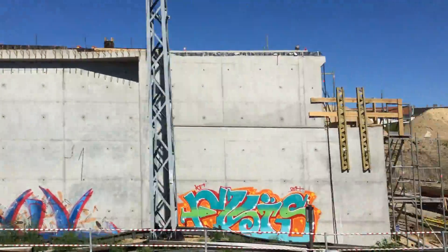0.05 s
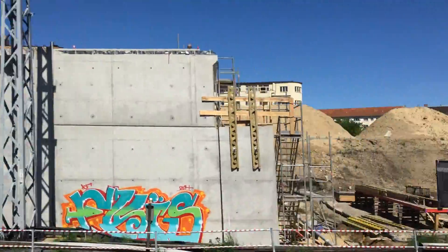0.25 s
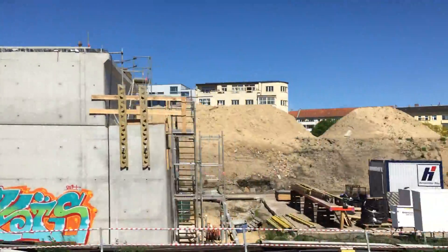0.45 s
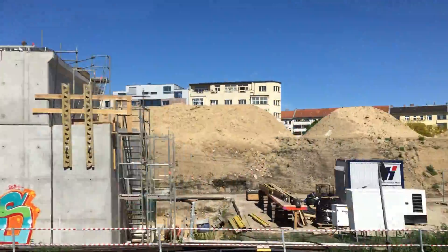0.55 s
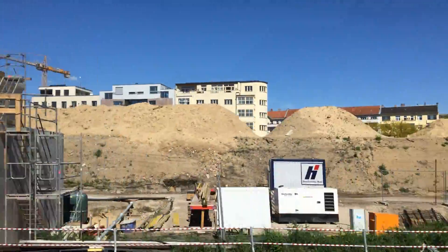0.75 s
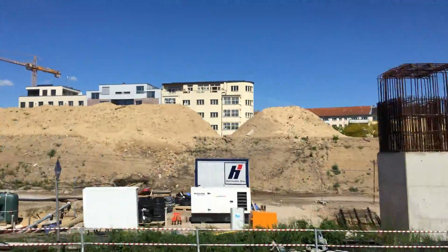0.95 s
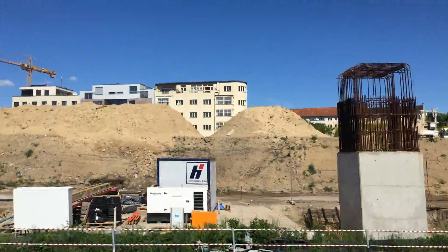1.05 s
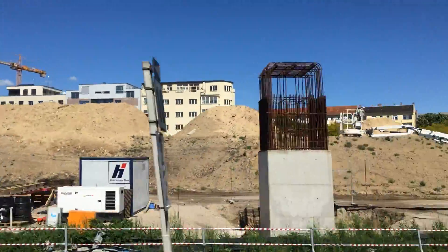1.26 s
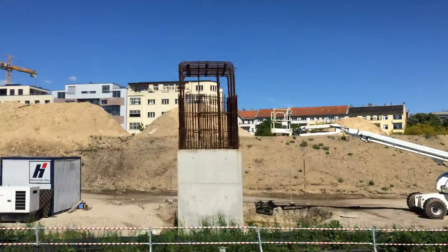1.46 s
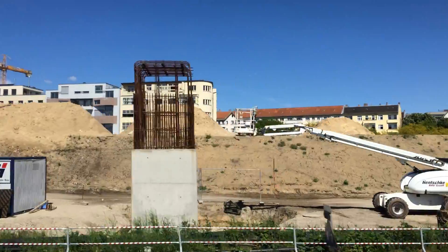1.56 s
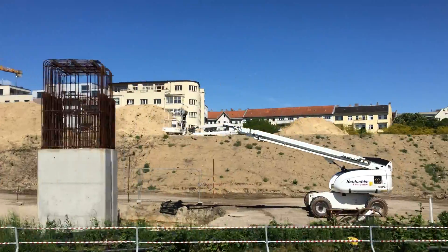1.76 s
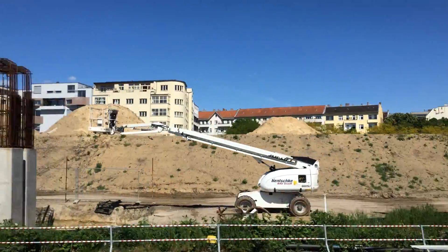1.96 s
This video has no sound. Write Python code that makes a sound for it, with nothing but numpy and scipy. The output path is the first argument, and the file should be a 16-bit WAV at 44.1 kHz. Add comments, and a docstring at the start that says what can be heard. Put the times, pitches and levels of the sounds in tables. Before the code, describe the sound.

A train's low rumble and wavering hum run for two seconds, heard inside the carriage over soft hiss and faint electric ticking. From about 0.85 seconds the wheels knock over a rail joint with a brief squeak, hardest at 1 second, where steel rings briefly and the hiss swells. A loose plastic panel rattles in dry clicks from 0.9 to 1.2 seconds, with scattered small clicks before and after.

```python
"""A low rumble and a wavering hum: inside a rolling train carriage, close to the window.
Wheel and rail roughness keeps the car body sounding. About a second in, the wheels knock over a rail
joint, with a brief squeak and a ring of steel. A loose plastic panel creaks and rattles in dry clicks,
hardest around the jolt. Underneath are a faint electric tick and a soft hiss that swells at the jolt."""
import sys
import numpy as np
from scipy import signal
from scipy.fft import rfft, irfft
from scipy.io import wavfile

SR = 44100
rng = np.random.default_rng(int(sys.argv[2]) if len(sys.argv) > 2 else 0)


def file_out(sig):
    """Save sig as 16-bit WAV at sys.argv[1]."""
    # one column per channel
    cols = np.atleast_2d(sig).T
    # limit, then scale
    lim = np.clip(cols, -1, 1)
    pcm = np.round(lim * 32767).astype(np.int16)
    wavfile.write(sys.argv[1], SR, pcm)


N = 88200

# Colour of the soft cabin hiss. Each row: frequency in Hz, relative level in dB.
HISS_COLOUR = [(1060, -23), (1800, 0.5), (2450, -16.5), (2950, -15), (3380, -10), (4390, -22), (5350, -18),
               (6400, -23.5), (7000, -19), (7750, -18.5), (8400, -22.5), (15500, -35)]
# The cabin hiss, swelling into a shaking wash at the jolt. Each row: time in seconds, level in dB.
HISS_RIDE = [(0, -54), (.7, -59), (.96, -58), (1.08, -46), (1.2, -58), (1.3, -63.5), (1.45, -57),
             (1.6, -57.5), (2, -53.5)]
# A faint, very high hiss that flares with the rattle and returns near the end.
# Each row: time in seconds, level in dB.
TOP_HISS_RIDE = [(0, -93.5), (.8, -95), (1.02, -73), (1.08, -78), (1.14, -92), (1.45, -80.5), (2, -81)]
# The wheels' lower hum. Each row: time in seconds, pitch in Hz, level in dB.
LOW_HUM = [(0.0, 208, -44.5), (0.17, 200.6, -34.5), (0.27, 204, -65), (0.28, 201.2, -30.5),
           (0.64, 202, -26), (0.73, 202.6, -36.5), (1.04, 208.6, -27), (1.13, 198.9, -25),
           (1.16, 205.3, -45), (1.31, 207.5, -34), (1.385, 210.4, -29.5), (1.4, 207, -32),
           (1.46, 202.6, -37.5), (1.77, 201.9, -34), (2.0, 198.8, -41.5)]
# The wheels' upper hum. Each row: time in seconds, pitch in Hz, level in dB.
HIGH_HUM = [(0.0, 534, -38), (0.05, 507.0, -39), (0.22, 516.2, -31.5), (0.84, 500.6, -46), (1.07, 502, -26),
            (1.09, 499, -63), (1.35, 503.9, -46), (1.43, 506.6, -33), (1.59, 510, -42), (2.0, 508, -47)]
# Swells of the rumble. Each row: time in seconds, body gain in dB, bass gain in dB.
RUMBLE_RIDE = [(0, -24, -31), (.12, -30.5, -36.5), (.25, -24, -34), (.4, -25, -34.5), (.55, -24, -35.5),
               (.65, -26, -35), (.73, -30.5, -31), (.82, -27.5, -34.5), (.92, -26.5, -25),
               (1.05, -18.5, -24.5), (1.16, -32, -30), (1.28, -31, -34), (1.43, -25.5, -32),
               (1.53, -29, -39), (1.64, -28, -30), (1.76, -26, -33.5), (1.9, -28, -35), (2, -29, -32.5)]
# Colour of the rumble's body. Each row: frequency in Hz, relative level in dB.
BODY_COLOUR = [(82, -29.5), (140, -18), (199, -11.5), (231, -7), (438, -3), (472, -8.5), (503, -11.5),
               (549, -21.5), (607, -24), (714, -17.5), (1260, -21), (1350, -23), (2800, -46), (3640, -68),
               (6160, -120)]
# Colour of the rumble's bass. Each row: frequency in Hz, relative level in dB.
BASS_COLOUR = [(12, -47.5), (20, -25), (32, -19.5), (97, 2), (120, -7.5), (145, -3), (170, -6.5),
               (220, -13), (370, -120)]
# Car body resonances. Each row: pitch in Hz, width in Hz, rolling gain in dB, knock gain in dB.
CAR_MODES = [(96, 42, -21, -10.5), (123.5, 10.5, -9.5, -18), (180.8, 12, -15, -18.5),
             (257, 23, -14.5, -14.5), (292, 51, -11.5, -12.5), (361.7, 25.4, -12, -8),
             (432.7, 25.5, -10.5, -18.5), (497.8, 15.7, -12.5, -16), (610.2, 26, -12.5, -21.5),
             (655.3, 27, -22, -18.5), (778.8, 77.6, -47.5, -15)]
# Resonances of a steel part. Each row: pitch in Hz, width in Hz, gain in dB.
STEEL_MODES = [(1140, 22, 0), (1470, 34, -7), (2030, 40, -18), (1000, 30, -11)]
# Blows on that part. Each row: start in seconds, strength in dB.
STEEL_BLOWS = [(0.9997, -23.5), (1.004, -10), (1.034, -30), (1.051, -30), (1.088, -29.5)]
# Slips of the plastic panel. Each row: start in seconds, level in dB, bright band offset in dB.
PANEL_CLICKS = [(0.3717, -35, -17), (0.374, -32, -17), (0.3756, -35, -20), (0.3839, -34, -11),
                (0.41, -37, -20), (0.4115, -39, -11), (0.9141, -37, -1), (0.9175, -33, -7),
                (0.9288, -32, -4), (0.9305, -36, -3), (0.9455, -22, -5), (0.9472, -26, 2),
                (0.9486, -29, -5), (0.958, -19, -17), (0.9618, -23, -16), (0.9655, -27, -17),
                (0.9695, -28, -24), (0.9791, -26, -6), (0.9915, -30, -23), (0.9941, -24, -22),
                (1.0023, -29, -33), (1.0061, -22, -18), (1.0105, -23, -12), (1.0158, -25, 3),
                (1.0219, -21, -12), (1.0238, -26, 6), (1.0259, -20, -8), (1.0312, -21, 7),
                (1.0372, -31, -15), (1.0397, -29, 5), (1.0488, -21, 2), (1.0535, -27, -11),
                (1.0583, -25, 1), (1.066, -33, 4), (1.0752, -26, -3), (1.0799, -27, -16), (1.0907, -33, 9),
                (1.0953, -29, -21), (1.1001, -29, 1), (1.1089, -29, 4), (1.1124, -34, -2),
                (1.1174, -38, -2), (1.1361, -24, 3), (1.1392, -30, 1), (1.1717, -30, -3), (1.1746, -34, -4),
                (1.1989, -34, -17), (1.2017, -32, -22), (1.2044, -37, -18), (1.2118, -38, -20),
                (1.2349, -33, -17), (1.2383, -30, -20), (1.2404, -33, -17), (1.3025, -43, -13),
                (1.4042, -39, -12), (1.4067, -39, -23), (1.409, -40, -18), (1.439, -43, -22),
                (1.6254, -32, -21), (1.6281, -33, -20), (1.6302, -35, -20), (1.6325, -37, -20),
                (1.7109, -35, -15), (1.7126, -35, -13), (1.7148, -38, -17), (1.8577, -30, -17),
                (1.8601, -29, -13), (1.8618, -31, -18), (1.8634, -31, -13), (1.8651, -34, -20),
                (1.9634, -36, -11), (1.9657, -35, -15), (1.9673, -37, -16)]
# Sparkle on top of the clicks. Each row: time in seconds, offset from the bright band in dB.
SPARKLE_RIDE = [(.9, -26), (1.03, -18), (1.13, -37), (1.86, -7)]
# Wheel knocks at the rail joint. Each row: start in seconds, strength in dB, grit gain in dB.
JOINT_KNOCKS = [(0.847, -22.5, -59), (0.883, -20, -50), (0.894, -17.5, -43.5), (.907, -12, -39.5),
                (0.942, -15.5, -45), (.962, -32, -48), (0.9945, -2.5, -37), (1.003, -4.5, -42),
                (1.011, -6, -48), (1.026, -8, -47), (1.046, -5, -38.5), (1.068, -20, -51),
                (1.084, -23, -47), (1.118, -35, -53)]


def amp(db):
    """dB to gain."""
    return 10 ** (np.asarray(db) / 20)


def rms_one(x):
    """Scale to rms 1."""
    return x / np.sqrt(np.mean(x ** 2) + 1e-20)


def noise(length=N):
    """White noise."""
    return rng.standard_normal(length)


def butter(x, order, hz, kind="low"):
    """Butterworth filter."""
    return signal.sosfilt(signal.butter(order, hz, kind, fs=SR, output="sos"), x + 1e-18)


def curves(rows):
    """One automation curve for each column after the time."""
    times, *columns = np.transpose(rows)
    return [np.interp(np.arange(N) / SR, times, column) for column in columns]


def coloured(points):
    """Noise with the given spectrum, falling 30 dB an octave outside it; rms 1."""
    hz, db = np.transpose(points)
    bins_hz = np.maximum(np.arange(N // 2 + 1) * SR / N, 1)
    octaves_outside = np.log2(np.maximum(np.maximum(hz[0] / bins_hz, bins_hz / hz[-1]), 1))
    shape_db = np.interp(np.log(bins_hz), np.log(hz), db) - 30 * octaves_outside
    return rms_one(irfft(rfft(noise()) * amp(shape_db), N))


def ring(x, hz, width_hz):
    """A resonance: a unit impulse starts a decaying sine of height 1."""
    radius, angle = np.exp(-np.pi * width_hz / SR), 2 * np.pi * hz / SR
    return signal.lfilter([0, np.sin(angle)], [1, -2 * radius * np.cos(angle), radius ** 2], x + 1e-18)


def ringing_noise(hz, width_hz):
    """A resonance fed by its own noise; rms 1."""
    return rms_one(ring(noise(), hz, width_hz))


def spikes(starts_s, gains):
    """Single-sample impulses."""
    out = np.zeros(N)
    np.add.at(out, np.clip((np.asarray(starts_s) * SR).astype(int), 0, N - 1), gains)
    return out


def snap(x, band_hz):
    """A steep band-pass, scaled so that a unit impulse peaks at 1."""
    unit_click = butter(spikes([0], 1)[:200], 3, band_hz, "band")
    return butter(x, 3, band_hz, "band") / np.abs(unit_click).max()


def fade(x, decay_s):
    """Each impulse leaves an exponential tail."""
    return signal.lfilter([1], [1, -np.exp(-1 / (decay_s * SR))], x + 1e-18)


def tone(hz, db):
    """A sine at the given pitch and rms level; the lower it is, the more its pitch wavers."""
    drift = rms_one(fade(fade(noise(), .01), .01))
    waver_hz = 3.32 * drift * 200 / hz
    return np.sqrt(2) * amp(db) * np.sin(2 * np.pi * np.cumsum(hz + waver_hz) / SR)


def cabin_hiss():
    """Soft cabin hiss, swelling into a shaking wash as the jolt rattles the carriage."""
    (level_db,) = curves(HISS_RIDE)
    return amp(level_db) * coloured(HISS_COLOUR)


def top_hiss():
    """A faint, very high hiss that flares with the rattle and returns near the end."""
    (level_db,) = curves(TOP_HISS_RIDE)
    return amp(level_db) * rms_one(snap(noise(), band_hz=(12500, 15200)))


def electric_tick(rate_hz=59.985, jitter_s=.0004, level_db=-50, spread_db=1.8):
    """A faint, uneven tick; its three short rings differ in strength each time."""
    count = int(rate_hz * N / SR)
    starts = .0109 + np.arange(count) / rate_hz + jitter_s * noise(count)
    out = np.zeros(N)
    for hz, polarity in ((3500, 1), (5400, -1), (7600, 1)):
        pulses = spikes(starts, amp(level_db + spread_db * noise(count)))
        out += polarity * ring(pulses, hz, width_hz=1300)
    return out


def wheel_hum(whine_hz=1226, whine_db=-49):
    """The rolling wheels sing two wavering hums, with a thin, slightly rough whine above."""
    hum = tone(*curves(LOW_HUM)) + tone(*curves(HIGH_HUM))
    whine = .8 * tone(whine_hz, db=0) + .2 * ringing_noise(whine_hz, width_hz=3.7)
    return hum + amp(whine_db) * whine


def rumble():
    """Wheel and rail roughness shakes the car body; its two lowest modes swell with the bass."""
    body_db, bass_db = curves(RUMBLE_RIDE)
    modes = [amp(db) * ringing_noise(hz, width) for hz, width, db, _ in CAR_MODES]
    body = amp(-6) * coloured(BODY_COLOUR) + sum(modes[2:])
    bass = coloured(BASS_COLOUR) + sum(modes[:2])
    return amp(body_db) * body + amp(bass_db) * bass


def squeak(start_s=.853, length_s=.03, level_db=-41):
    """A brief, rough squeak as the jolt begins."""
    progress = np.clip((np.arange(N) / SR - start_s) / length_s, 0, 1)
    swell = np.sqrt(np.sin(np.pi * progress))
    return amp(level_db) * swell * ringing_noise(hz=1870, width_hz=50)


def steel_ring():
    """A steel part, struck during the jolt, rings briefly."""
    starts, strength_db = np.transpose(STEEL_BLOWS)
    blows = butter(spikes(starts, amp(strength_db)), order=2, hz=3000)
    return sum((-1) ** k * amp(db) * ring(blows, hz, width)
               for k, (hz, width, db) in enumerate(STEEL_MODES))


def loose_rattle(hits_per_s=200, gain_db=-43):
    """Small random impulses that the knocks shake out of the panel, dying away after each."""
    starts, knock_db, _ = np.transpose(JOINT_KNOCKS)
    shake = fade(spikes(starts, amp(knock_db)), decay_s=.07)
    contacts = rng.random(N) < hits_per_s / SR
    accent_db = 3.8 * np.minimum(rng.exponential(1, N), 3)
    return contacts * shake * amp(gain_db + accent_db)


def plastic_panel():
    """The panel slips and rattles: dry clicks in three bands, with a short tail and a faint cabin wash."""
    starts, db, bright_db = np.transpose(PANEL_CLICKS)
    sparkle_db = np.interp(starts, *np.transpose(SPARKLE_RIDE))
    rattle = loose_rattle()
    dull = spikes(starts, amp(db + 1)) + rattle
    bright = spikes(starts, amp(db + bright_db)) + amp(-20) * rattle
    sparkle = -spikes(starts, amp(db + bright_db + sparkle_db))
    out = np.zeros(N)
    for hits, band_hz in ((dull, (1700, 3830)), (bright, (5700, 9520)), (sparkle, (9800, 13300))):
        tail = amp(-23.5) * fade(hits, decay_s=.0016)
        cabin_wash = amp(-51.5) * np.sqrt(fade(hits ** 2, decay_s=.023))
        out += snap((tail + cabin_wash) * noise() - hits, band_hz)
    return out


def joint_knocks(push_gain_db=24.5, shudder_db=-23, spread_db=4):
    """Wheels hit the joint: a low push, a soft shuddering blow that rings the car body, and grit."""
    thuds = np.zeros(N)
    for start_s, strength_db, _ in JOINT_KNOCKS:
        first = int(start_s * SR)
        hit = spikes([0], amp(strength_db))[:min(SR // 4, N - first)]
        shudder = amp(shudder_db) * fade(hit, decay_s=.011) * noise(len(hit))
        blow = butter(hit + shudder, order=2, hz=1700)
        thud = amp(push_gain_db) * butter(hit, order=4, hz=480)
        for k, (hz, width, _, mode_db) in enumerate(CAR_MODES):
            thud += (-1) ** k * amp(mode_db + rng.normal(0, spread_db)) * ring(blow, hz, width)
        thuds[first:first + len(hit)] += thud
    starts, _, grit_db = np.transpose(JOINT_KNOCKS)
    bursts = fade(spikes(starts, amp(grit_db)), decay_s=.017)
    grit = snap(bursts * noise(), band_hz=(590, 1640))
    return grit + butter(thuds, order=2, hz=70, kind="high")


def scene():
    """The rolling bed, the jolt and the panel, mixed in mono."""
    bed = cabin_hiss() + top_hiss() + wheel_hum() + rumble()
    jolt = joint_knocks() + squeak() + steel_ring()
    return (bed + jolt + plastic_panel() + electric_tick())[None]


def record(dry, ceiling=.8, top_cut_hz=15900):
    """A small microphone loses the deepest bass; peaks are rounded and the top is cut."""
    lean = butter(dry, order=2, hz=45, kind="high")
    rounded = ceiling * np.tanh(lean / ceiling)
    return signal.sosfilt(signal.cheby2(20, 70, top_cut_hz, fs=SR, output="sos"), rounded)


dry = scene()
out = record(dry)
file_out(out)
```